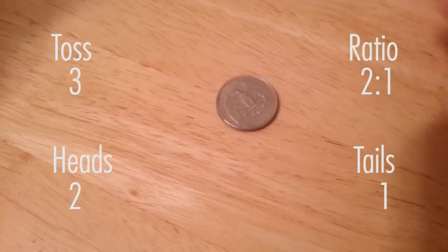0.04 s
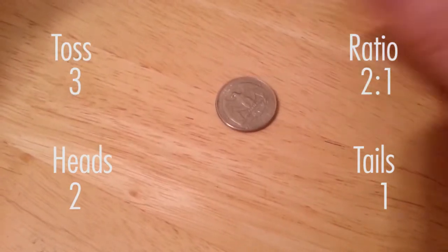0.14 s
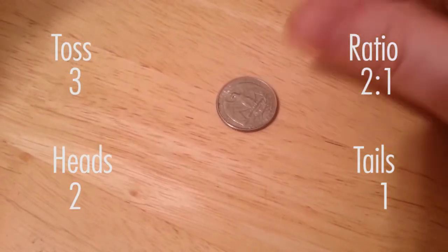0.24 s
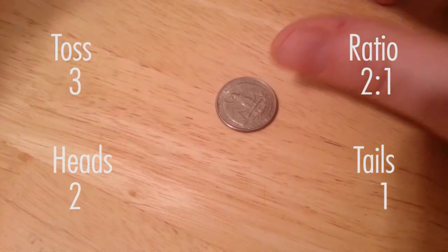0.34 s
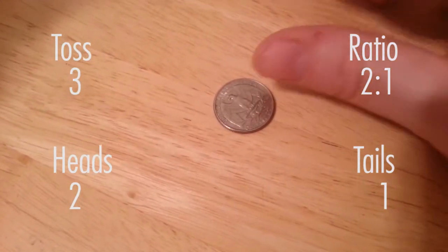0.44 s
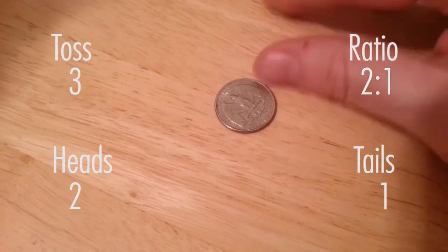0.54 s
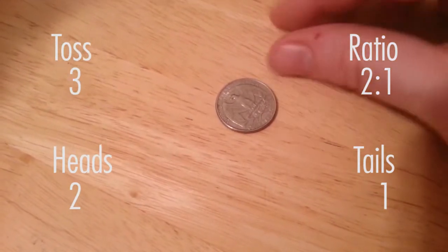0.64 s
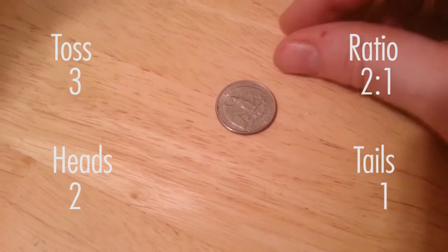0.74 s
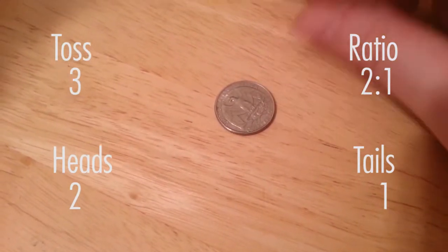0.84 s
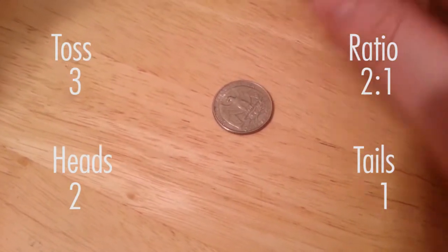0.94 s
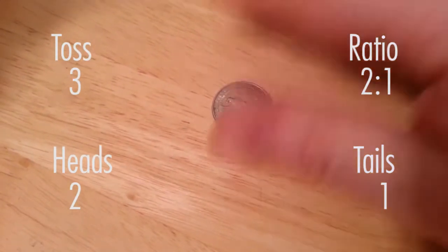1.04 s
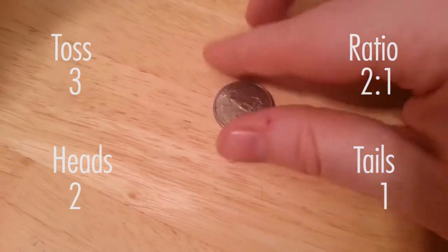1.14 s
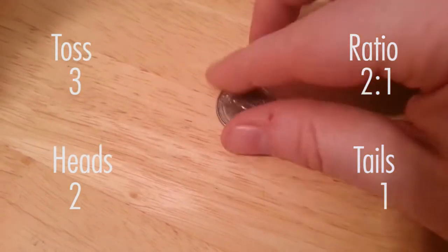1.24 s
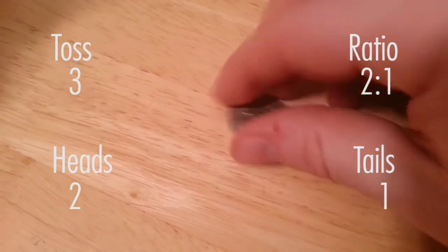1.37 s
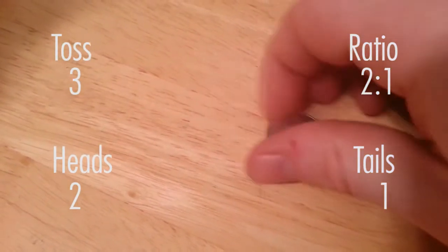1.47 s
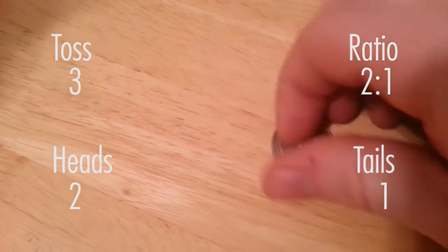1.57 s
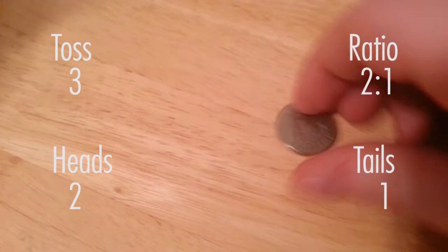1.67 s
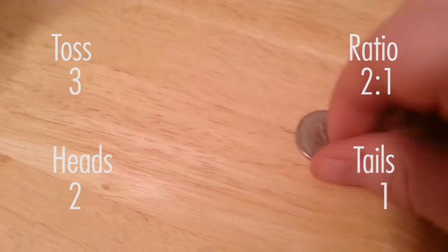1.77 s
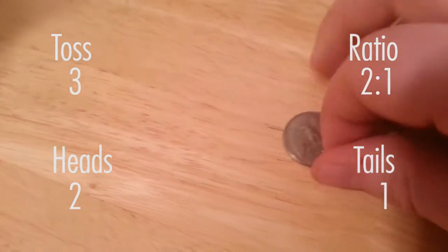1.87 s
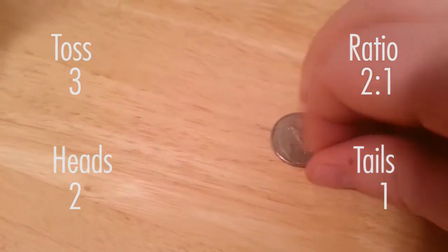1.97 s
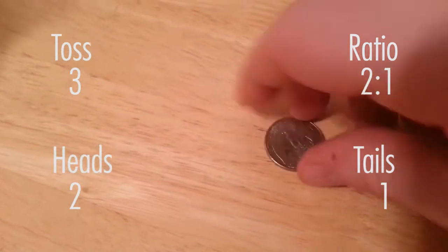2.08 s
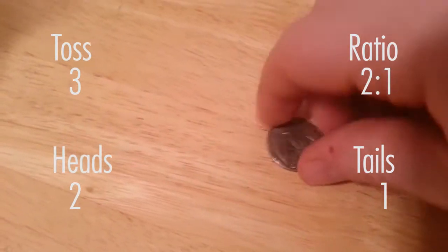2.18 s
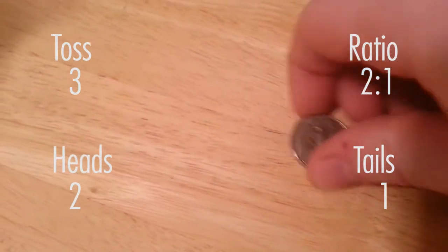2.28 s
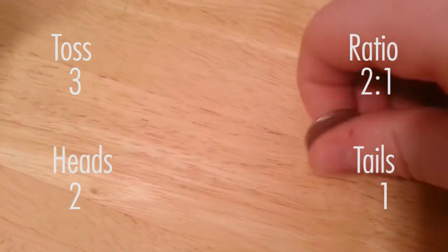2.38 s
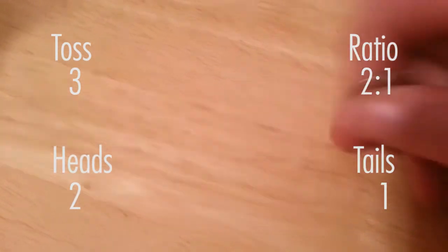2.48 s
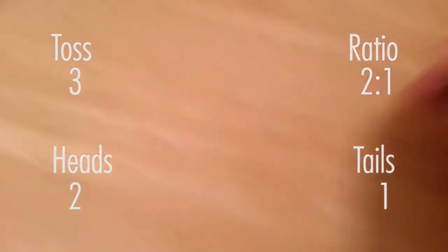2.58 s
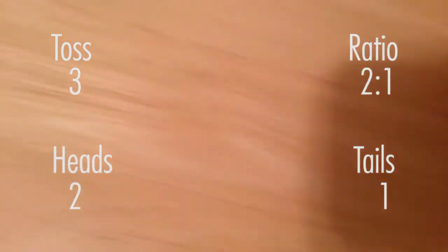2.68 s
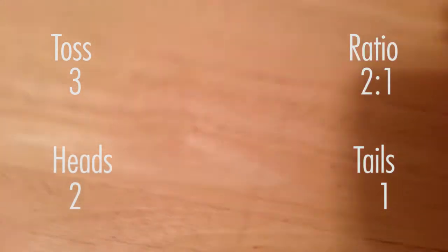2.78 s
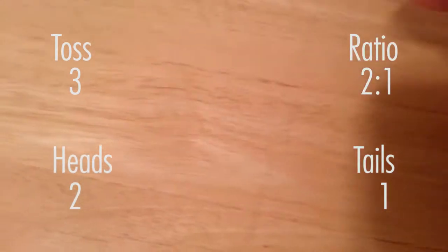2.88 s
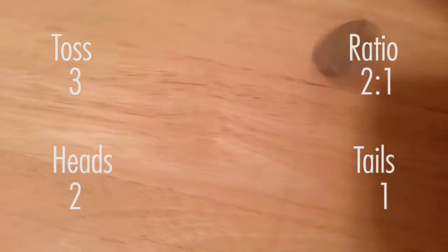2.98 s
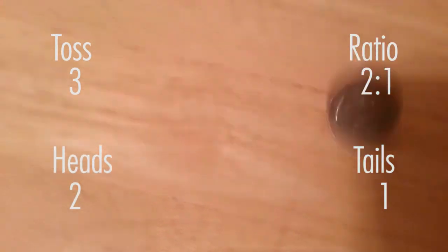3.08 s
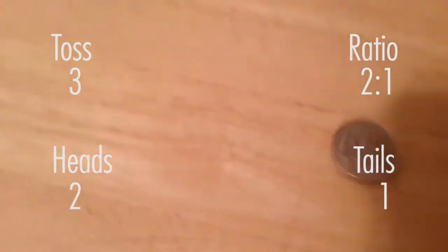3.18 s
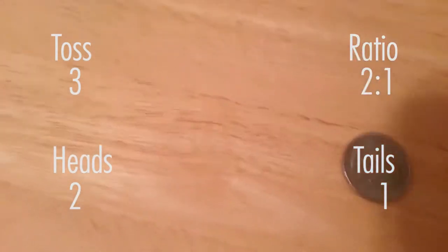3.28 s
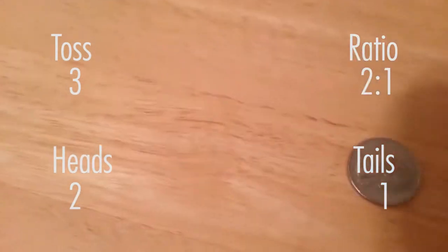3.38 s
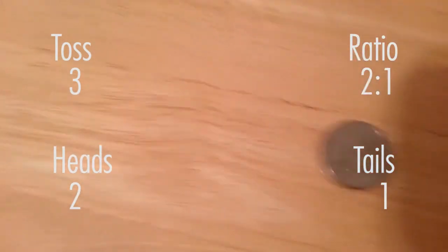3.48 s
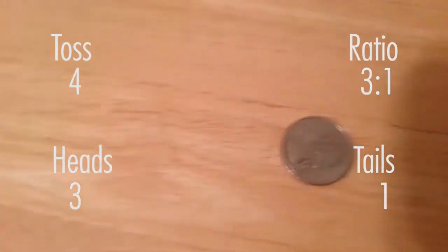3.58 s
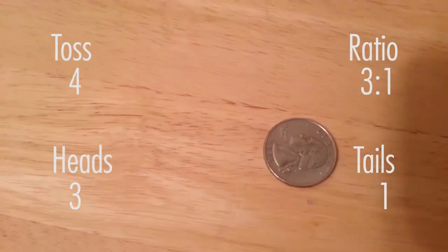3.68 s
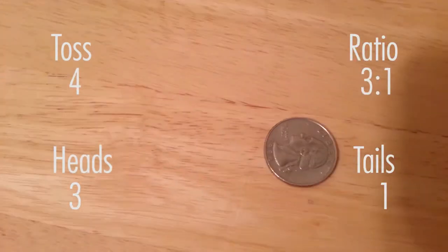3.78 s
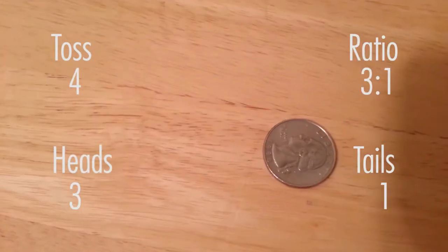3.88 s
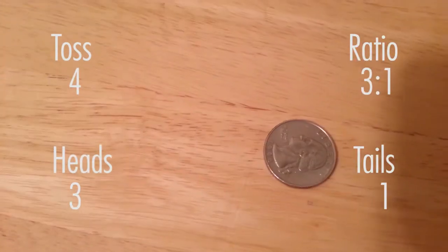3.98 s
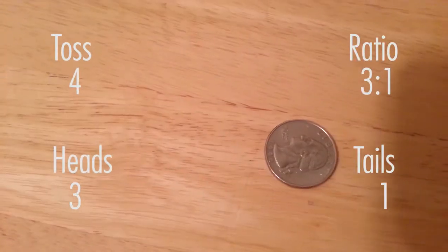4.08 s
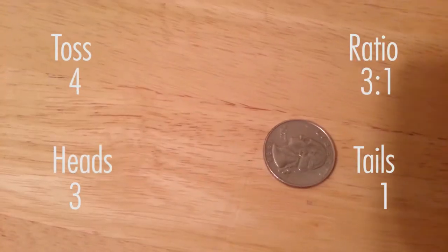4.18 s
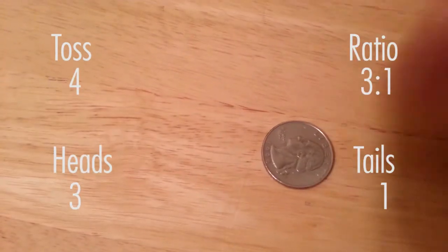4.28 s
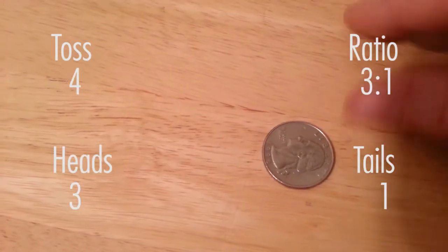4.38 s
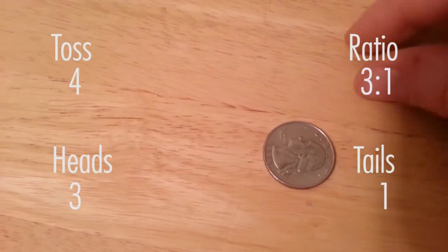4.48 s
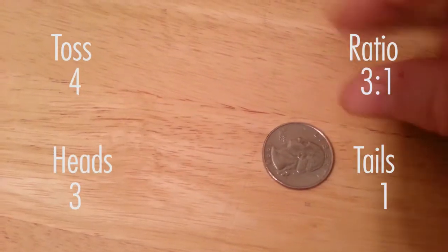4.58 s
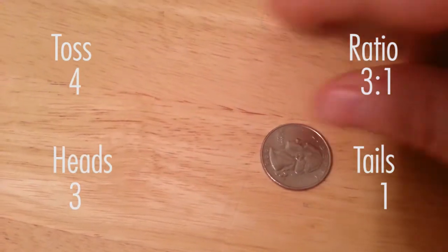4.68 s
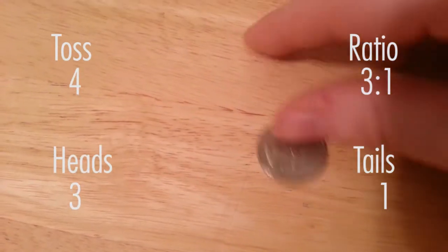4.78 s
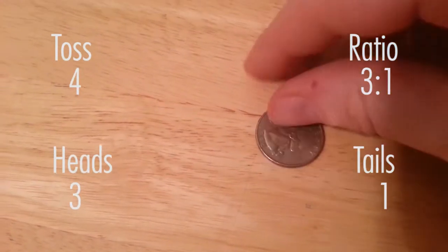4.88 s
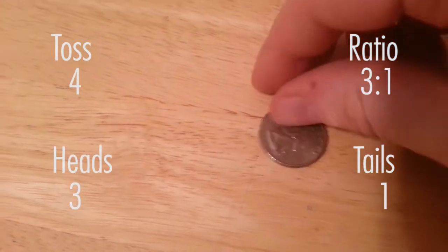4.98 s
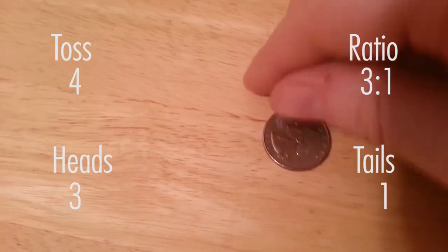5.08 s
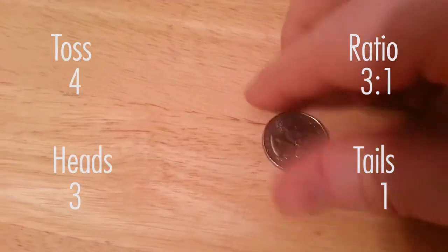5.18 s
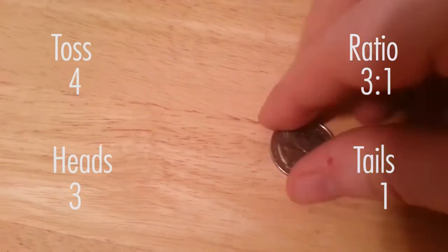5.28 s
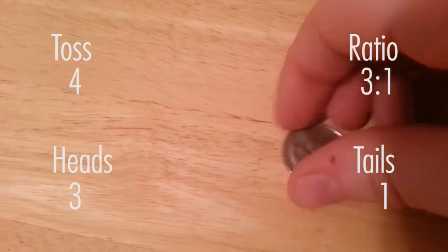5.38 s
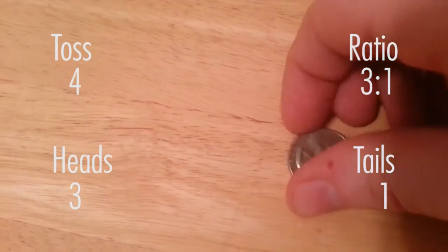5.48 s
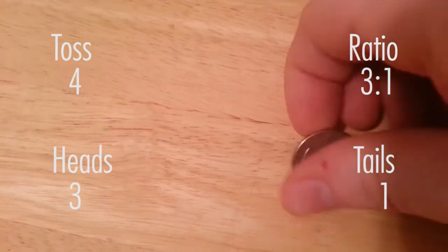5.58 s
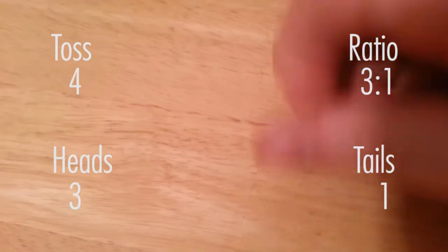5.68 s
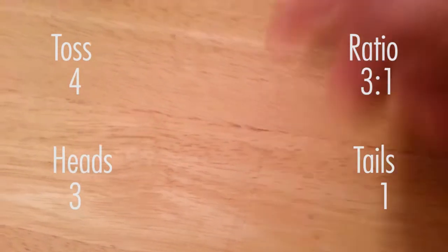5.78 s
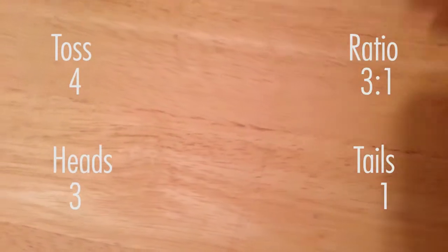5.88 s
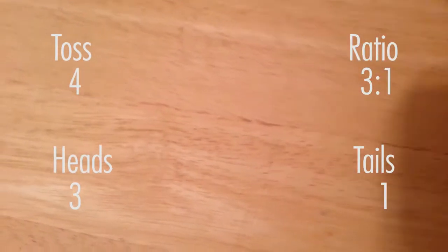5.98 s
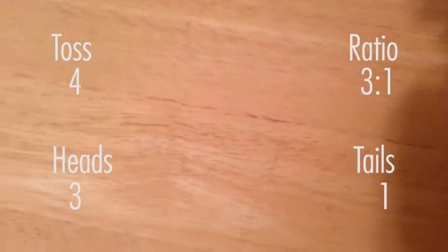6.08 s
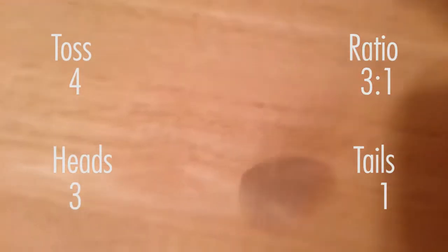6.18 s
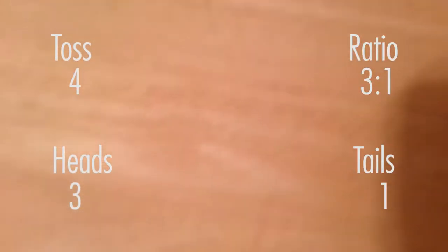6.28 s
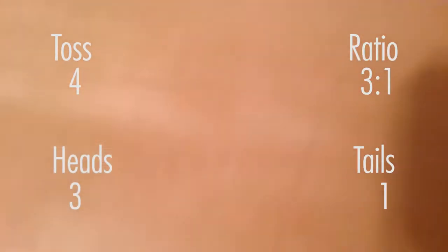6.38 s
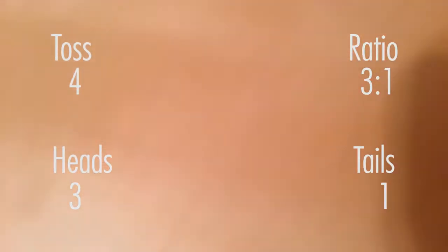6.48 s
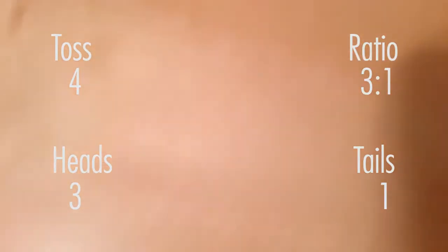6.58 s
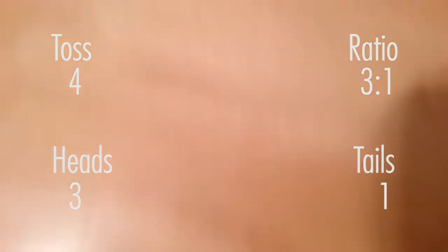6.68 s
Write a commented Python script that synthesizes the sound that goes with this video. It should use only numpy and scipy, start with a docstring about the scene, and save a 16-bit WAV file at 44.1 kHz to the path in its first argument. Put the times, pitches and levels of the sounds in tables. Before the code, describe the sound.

Close up, a coin is handled and tossed on wood: soft rubs, taps and thumps between hard knocks that speed into a ringing rattle.

```python
"""A coin rattles on its rim and rings near 9.5 kHz, over faint hiss and rumble, close to a pair of microphones.
A hand then slides it over a wooden table, rubs and taps; the arm thumps the table and small dry ticks are heard.
Twice the tossed coin lands and bounces ever faster; the loudest landings overload the input.
Each contact is a noisy force that sets the table top sounding; ringing, thumps, ticks and air noises join it."""
import sys
import numpy as np
from scipy import signal
from scipy.fft import rfft, irfft
from scipy.io import wavfile
from scipy.ndimage import uniform_filter1d

SR = 44100
rng = np.random.default_rng(int(sys.argv[2]) if len(sys.argv) > 2 else 0)


def int16_out(signal):
    """Quantize to a 16-bit WAV file."""
    q = np.round(np.clip(np.atleast_2d(signal).T, -1, 1) * 32767)
    wavfile.write(sys.argv[1], SR, q.astype(np.int16))


def gain_from_decibels(decibels):
    """Convert decibel values to linear amplitude factors."""
    exponent = np.asarray(decibels, float) / 20
    return 10 ** exponent


N = 297234  # length of the scene in samples
LEAD = 400  # samples that the band split spreads ahead of a blow
UPPER_FOLLOWS_BRIGHT = .27  # dB of upper part per dB of bright part, for coin contacts


def rms_one(x):
    """Scales a sound to rms 1."""
    return x / np.sqrt(np.mean(x ** 2) + 1e-20)


def look_up(points, hz):
    """Value of a (f/Hz, value) table on a log-frequency axis."""
    f, value = np.transpose(points)
    return np.interp(np.log(hz + 1), np.log(f + 1), value)


def add(mix, s, sound):
    """Mixes a sound in at time s."""
    part = mix[..., round(s * SR):][..., :sound.shape[-1]]
    part += sound[..., :part.shape[-1]]


def curves(rows):
    """Start time of a curve table, and its other columns drawn out sample by sample."""
    s, *values = np.transpose(rows)
    t = np.arange(s[0], s[-1], 1 / SR)
    return s[0], np.array([np.interp(t, s, v) for v in values])


def resonate(x, hz, width_hz):
    """Shifts the curve hz down to zero, smooths, and shifts back: a resonance of gain 1."""
    turn = np.exp(2j * np.pi * np.cumsum(hz * np.ones(x.shape[-1])) / SR)
    r = np.exp(-np.pi * width_hz / SR)
    smooth = signal.lfilter([1 - r], [1, -r], x / turn)
    return 2 * (turn * smooth).real


def noise(length, level_db, same, size):
    """Two partly alike channels of noise; level_db(hz, s) shapes it."""
    hz = np.fft.rfftfreq(size, 1 / SR)[:, None]
    s = np.arange(4 * length // size + 5) * size / 4 / SR
    a, b, c, d = rng.standard_normal((len(s), len(hz), 4)).T
    left, other = a + 1j * b, c + 1j * d
    like = np.clip(look_up(same, hz), -1, 1)
    right = like * left + np.sqrt(1 - like ** 2) * other
    spectra = np.array([left, right]) * gain_from_decibels(level_db(hz, s))
    return signal.istft(spectra, nperseg=size, noverlap=3 * size // 4)[1][:, :length]


RATTLE_LOW_DB, RATTLE_UPPER_DB = -6.5, -5.5  # relative to the force; upper at bright 0 dB
TOUCHES_PER_S = 300  # on average, roughly
# coin wobbling on its rim: (t/s, force level/dB, bright part level/dB relative to the force)
RIM_RATTLES = [
    [(0.0, -31, -7), (0.13, -34, -9), (0.18, -28, -3), (0.225, -35.5, -4), (0.25, -30, -2.5),
     (0.306, -31, -3.5), (0.36, -39.5, -17)],
    [(3.36, -30, -1), (3.392, -29, -21), (3.484, -38, -23.5), (3.698, -32, -7), (3.72, -48, -13)],
    [(6.51, -26, -21.5), (6.556, -29, -46), (6.63, -42.5, -60), (6.66, -32.5, -20), (6.688, -26.5, -17.5),
     (6.74, -52, -28)],
]


def rattles():
    """The rim touches down about three hundred times a second, unevenly, each touch of its own size."""
    force = np.zeros((4, N))
    for rows in RIM_RATTLES:
        s, (db, bright_db) = curves(rows)
        pace = 1 + 3.0 * uniform_filter1d(rng.standard_normal(len(db)), size=200)
        touches_so_far = np.floor(np.cumsum(TOUCHES_PER_S * np.abs(pace)) / SR)
        touch = np.diff(touches_so_far, prepend=0)
        touch *= gain_from_decibels(2.2 * rng.standard_normal(len(db)))
        roll = rms_one(touch) + 0.58 * rng.standard_normal(len(db))  # the rim also rolls between touches
        upper_db = RATTLE_UPPER_DB + UPPER_FOLLOWS_BRIGHT * bright_db
        bands_db = np.array([db + RATTLE_LOW_DB, db, db + upper_db, db + bright_db])
        add(force, s, gain_from_decibels(bands_db) * roll)
    return force


LOW_HZ, UPPER_HZ, BRIGHT_HZ = 1000, 3000, 6500  # where the four parts of the sound meet
MODES_DB, ROOM_DB = .5, -3.5  # relative to the knock
# modes (favourite pitches) of the table top: (f/Hz, width/Hz, level/dB)
WOOD_MODES = [(135, 14, 1), (255, 20, 4), (366, 12, 6), (496, 19, 2.5), (547, 22, -1.5), (673, 30, -6),
              (759, 30, -5), (1105, 12, -4), (1179, 12, -4), (1495, 25, -5), (1745, 30, -6), (2014, 35, -3),
              (2332, 45, -1), (2757, 22, -1), (2929, 30, -7), (3180, 22, -2.5), (3340, 40, -1),
              (3962, 40, -6), (4237, 60, -7), (4890, 50, -2), (5421, 60, -12), (5906, 32, -11)]
# modes too close to tell apart, as a tone colour: (f/Hz, relative level per Hz/dB)
DENSE_MODES = [(60, -57), (130, -13), (300, -0.5), (600, -6.5), (1200, -4.5), (3200, -7), (4300, -9.5),
               (5800, -14), (7000, -18.5), (8300, -25), (9700, -16), (10800, -31.5), (15500, -37.5)]
# first fall of a blow: (f/Hz, time to fall by 60 dB/s)
KNOCK_FALL = [(200, 0.081), (1000, 0.023), (4000, 0.02), (12000, 0.018)]
# slower fall of the room: (f/Hz, time to fall by 60 dB/s)
ROOM_FALL = [(150, 0.81), (1000, 0.35), (4000, 0.33), (8000, .15), (14000, 0.027)]
# how alike a blow is left and right: (f/Hz, likeness from -1 to 1)
BLOW_LIKENESS = [(100, 0.8), (300, 0.92), (640, 0.8), (1400, -0.28), (3100, 0.134), (6800, -0.26),
                 (15000, -0.099)]
# balance of a blow: (f/Hz, left minus right level/dB)
BLOW_LEAN = [(100, .5), (400, 1), (2400, -1), (9000, 2)]


def table_response(spot):
    """What one point blow leaves, as low, middle, upper and bright parts (parts x channels x samples)."""
    length = SR // 3
    t = np.arange(length) / SR

    def falling(fall):
        return lambda hz, s: look_up(DENSE_MODES, hz) - 60 * s / look_up(fall, hz)

    knock = rms_one(noise(length, falling(KNOCK_FALL), BLOW_LIKENESS, size=128))
    room = rms_one(noise(length, falling(ROOM_FALL), BLOW_LIKENESS, size=256))
    modes = np.zeros((2, length))
    for hz, width, db in WOOD_MODES:
        # the modes ring evenly wherever the contact is; only their phase shifts
        right_lag = np.arccos(np.clip(look_up(BLOW_LIKENESS, hz), -1, 1))
        lag = right_lag * np.array([[0], [1]]) + np.pi * spot / 3
        fading = gain_from_decibels(db) * np.sqrt(width) * np.exp(-np.pi * width * t)
        modes += fading * np.sin(2 * np.pi * hz * t + lag)
    hz = np.fft.rfftfreq(2 * length, 1 / SR)
    rise = 1 - np.exp(-(t / .00015) ** 2)  # the sound fades in over a fraction of a millisecond
    sound = rise * (knock + gain_from_decibels(MODES_DB) * rms_one(modes) + gain_from_decibels(ROOM_DB) * room)
    whole = rfft(sound, 2 * length)
    whole = whole * gain_from_decibels(np.outer([.5, -.5], look_up(BLOW_LEAN, hz)))
    whole = whole * (1j * hz / (115 + 1j * hz)) ** 3  # the deepest bass is taken out of the table's sound
    edges = [1 / (1 + (hz / edge) ** 4) for edge in (LOW_HZ, UPPER_HZ, BRIGHT_HZ)]
    below = [0 * hz] + edges + [1 + 0 * hz]
    parts = irfft(whole * np.diff(below, axis=0)[:, None])  # the four shares sum to 1
    parts = np.roll(parts, LEAD, axis=2)[..., :length]
    # each part gets energy 1 in the mean of left and right
    return np.array([part / np.linalg.norm(part.mean(0)) for part in parts])


COIN_HZ, PARTNER_DB = 9525, -4.5  # middle of the pair; second mode relative to the first
FLUTTER_DB = 2.5  # rms wander of the level
CLINK_WIDTH_HZ, CLINK_DB = 150, -9
# the coin set ringing; spin and contact split the pair of modes:
# (t/s, length/s, level/dB before the left-right lean, fade/dB per s, partner f minus first f/Hz)
COIN_RINGS = [(0.0, 0.14, -33, 80, -135), (.16, .2, -27.5, 110, 168), (3.031, .144, -44, 82, 27),
              (3.159, .15, -25.5, 90, 48.5), (3.304, .095, -31, 31.5, 48.5),
              (3.389, 0.26, -22, 101.5, -55.5), (6.263, 0.47, -47.5, 22, 25)]


def ring(bright_force):
    """A close pair of bending modes beats and fades with a fluttering level; contacts add a short clink."""
    out = np.zeros((2, N))
    for s, length, db, fade_db_per_s, split_hz in COIN_RINGS:
        t = np.arange(0, length, 1 / SR)
        pair = (COIN_HZ - split_hz / 2, 0), (COIN_HZ + split_hz / 2, PARTNER_DB)
        for pitch, share_db in pair:
            phase = 2 * np.pi * (pitch * t + rng.random() + np.array([[0], [.15]]))
            flutter_db = FLUTTER_DB * rms_one(uniform_filter1d(rng.standard_normal(len(t)), size=500))
            level = gain_from_decibels(db - fade_db_per_s * t + share_db + flutter_db)
            tone = np.sqrt(2) * level * np.sin(phase)
            add(out, s, tone * signal.windows.tukey(len(t), .02))
    out += gain_from_decibels(CLINK_DB) * resonate(bright_force, COIN_HZ, CLINK_WIDTH_HZ)
    return out * gain_from_decibels(np.array([[2.5], [-2.5]]))  # leans left


AIR_DB = -46.5  # rms of the room tone
# tone colour of the room: (f/Hz, relative level per Hz/dB)
AIR_COLOUR = [(15, -73), (25, -21.5), (69, 3), (93, -4), (289, -12), (523, -18), (614, -21.5), (1170, -24),
              (1660, -26), (2850, -28.5), (4500, -30), (5010, -28), (15500, -35.5)]
# how alike the room tone is left and right: (f/Hz, likeness from -1 to 1)
AIR_LIKENESS = [(60, 1), (240, 0.65), (950, -0.02), (3770, 0.024), (15000, -0.5)]


def room_tone():
    """Steady hiss and low rumble: shaped noise that does not change in level."""
    air = noise(N, lambda hz, s: look_up(AIR_COLOUR, hz) + 0 * s, AIR_LIKENESS, size=2048)
    return gain_from_decibels(AIR_DB) * rms_one(air)


def grit(length):
    """Lumpy friction noise of rms 1."""
    lumps_db = 3.5 * rms_one(uniform_filter1d(rng.standard_normal(length), size=90))
    return rms_one(rng.standard_normal(length) * gain_from_decibels(lumps_db))


SLIDE_EDGE_DB = -19.5  # at both ends, relative to the loudest moment
SLIDE_UPPER_DB, SLIDE_BRIGHT_DB = -14, -11.5  # upper part at MID_SCRAPE_HZ; bright below upper
UPPER_DB_PER_OCTAVE, MID_SCRAPE_HZ = 8.5, 1600  # higher scrapes are crisper
SCRAPE_PEAK, SCRAPE_WIDTH_HZ = 2.4, 420
SLIDE_SAG = 0.396  # share of its f by which the centre sags, as the drag slows
# coin and skin dragged over the grain: (loudest t/s, rise/s, fall/s, force level/dB, scrape centre f/Hz)
COIN_SLIDES = [(.44, .02, 0.077, -53.5, 1600), (.576, .09, 0.21, -55.5, 1470),
               (1.251, .11, 0.59, -57, 1700), (1.454, .06, .17, -43, 2340), (1.68, .06, 0.19, -42.5, 2400),
               (1.75, .08, 0.1464, -40, 1750), (2.18, .015, .06, -42, 1880),
               (2.401, .04, 0.092, -46.5, 2010), (4.618, .03, 0.156, -52.5, 1100),
               (4.856, .08, 0.074, -47, 1975), (5.294, 0.049, 0.126, -56, 2350),
               (5.499, 0.27, .2, -53.5, 1300), (5.686, 0.036, 0.01, -32.5, 1304),
               (5.71, .02, 0.21, -58, 1200)]


def slides():
    """Each drag over the grain swells and fades, peaking at a sagging resonance."""
    force = np.zeros((4, N))
    for s, rise, fall, db, hz in COIN_SLIDES:
        t = np.arange(-rise, fall, 1 / SR)
        rough = grit(len(t))
        upper_db = SLIDE_UPPER_DB + UPPER_DB_PER_OCTAVE * np.log2(hz / MID_SCRAPE_HZ)
        centre_hz = hz * (1 - SLIDE_SAG * t / (rise + fall))
        peaked = rms_one(rough + SCRAPE_PEAK * resonate(rough, centre_hz, SCRAPE_WIDTH_HZ))
        level = gain_from_decibels(db + SLIDE_EDGE_DB * np.where(t < 0, -t / rise, t / fall))
        bands = np.array([peaked, gain_from_decibels(upper_db) * rough, gain_from_decibels(upper_db + SLIDE_BRIGHT_DB) * rough])
        add(force[1:], s - rise, level * bands)
    return force


# low rubbing of the hand on the table: (t/s, force level/dB)
HAND_RUBS = [
    [(.42, -64), (.436, -45.5), (.486, -52.5), (.576, -48.5), (.9, -63.5)],
    [(1.14, -51), (1.38, -49), (1.42, -71.5), (1.62, -46.5), (1.748, -53.5), (1.828, -32), (1.92, -57)],
    [(2.36, -50), (2.398, -44), (2.52, -60)],
    [(4.4, -47), (4.6, -58), (4.75, -61), (4.856, -44), (4.95, -67)],
    [(5.25, -54), (5.294, -47.5), (5.344, -49.5), (5.64, -51.5), (5.686, -43), (5.72, -58.5), (5.88, -65)],
]


def rubs():
    """The hand rubs the table: friction noise in the low part alone."""
    force = np.zeros((4, N))
    for rows in HAND_RUBS:
        s, (db,) = curves(rows)
        add(force[0], s, gain_from_decibels(db) * grit(len(db)))
    return force


# arm and wrist bumping the table: (t/s, level/dB before the soft rise, f/Hz, time to fall by 60 dB/s)
ARM_THUMPS = [(0.429, -32.5, 78.1, 0.068), (0.572, -20.5, 53.3, 0.0415), (0.841, -40, 90.5, 0.068),
              (1.129, -25.5, 116.6, 0.157), (1.526, -12.5, 89, 0.061), (2.176, -16.5, 78.3, 0.12),
              (2.378, -16.5, 136, 0.077), (2.597, -27, 133, 0.23), (2.941, -39.5, 127, 0.75),
              (4.375, -22.5, 69.5, 0.136), (4.679, -21.5, 102.9, 0.076), (5.468, -27.5, 130.3, 0.091),
              (5.572, -23.5, 113, 0.11), (6.579, -24, 111, 0.113)]


def thumps():
    """A soft push sets a low, fading wobble going."""
    out, t = np.zeros(N), np.arange(SR // 3) / SR
    for s, db, hz, t60 in ARM_THUMPS:
        wobble = np.sin(2 * np.pi * hz * t) + 0.54 * np.sin(2 * np.pi * 1.6 * hz * t)
        soft_rise = 1 - np.exp(-t / 0.0064)
        add(out, s, gain_from_decibels(db - 60 * t / t60) * soft_rise * wobble)
    return out


TICK_HZ = 1460
# small dry ticks: (t/s, level/dB of the cycles as they start)
DRY_TICKS = [(0.4403, -24.5), (0.4653, -42), (0.4895, -34), (0.5143, -31), (0.5386, -30), (0.5673, -32),
             (0.586, -35), (0.606, -38), (1.3268, -34.5), (6.1436, -35)]


def ticks():
    """A thin click and a few cycles of a small stiff part, whose cycles lag a little on the right."""
    out, t = np.zeros((2, N)), np.arange(1000) / SR
    clicks = rng.standard_normal((len(DRY_TICKS), 2, len(t)))
    for (s, db), click in zip(DRY_TICKS, clicks):
        cycles = np.sin(2 * np.pi * (TICK_HZ * t - np.array([[0], [.2]])))
        cycles *= gain_from_decibels(-60 * t / .012)
        snap = click * np.exp(-t / .0015)
        for _ in range(2):
            snap = resonate(snap, 2300, width_hz=1600)
        add(out, s, gain_from_decibels(db) * (cycles + 1.05 * snap))
    return out


# weak blows come from a rolling rim or skin and last longer; they also lose the clean click and swell in
CONTACT_MS, SOFTER_MS_PER_DB = 2.3, .08  # fading time of a 0 dB blow; time lost per dB of force
FIRST_TOUCH, CLEAN_ABOVE_DB = 2.2, 8  # clean click relative to the rest; the force that brings it fully
RISE_SHARE = .4  # swelling time as a share of the fading time


def strike(rows):
    """Each blow is a short cluster of micro-contacts; its force is shared among the four bands."""
    force, t = np.zeros((4, N)), np.arange(1500) / SR
    jolts = rng.standard_normal((len(rows), len(t)))
    for (s, db, low_db, upper_db, bright_db), jolt in zip(rows, jolts):
        u = 1000 * t / max(CONTACT_MS - SOFTER_MS_PER_DB * db, .2)
        cluster = jolt * np.exp(-u) * (1 - np.exp(-u / RISE_SHARE))
        # the first touch is one clean click
        cluster[0] = FIRST_TOUCH * gain_from_decibels(min(db - CLEAN_ABOVE_DB, 0)) * np.linalg.norm(cluster)
        strength = gain_from_decibels(db + np.array([low_db, 0, upper_db, bright_db]))
        add(force, s, strength[:, None] * cluster / np.linalg.norm(cluster))
    return force


TAP_BRIGHT_DB = -17.5  # relative to the upper part
# fingers and nails tapping table and coin, parts relative to the force:
# (t/s, force level/dB, low part level/dB, upper part level/dB)
FINGER_TAPS = [(1.234, -20, -7, -23), (1.2563, -13, -21, -17), (1.533, -14, 6, 1.1),
               (1.6399, -11, -23, -18), (1.6745, -14, 2, -12.5), (1.7973, -11, 13, -24),
               (1.82, -15, 14, -20), (1.8384, -14, 13, -2), (1.9999, -16, 8.5, -19),
               (2.0672, -16.5, 6.5, -38.5), (2.176, -11, 2.5, -17), (2.3872, -11, -22, -18),
               (4.607, -20, 5.5, -28), (5.0757, -25, 7.16, -21), (5.2861, -19, 0, -12),
               (5.5187, -28.5, 10, 1), (5.5743, -18.5, 6.5, -17), (5.6796, 0.3, -26, -49)]


def taps():
    """Fingers and nails strike the table and coin."""
    return strike([(s, db, low_db, upper_db, upper_db + TAP_BRIGHT_DB)
                   for s, db, low_db, upper_db in FINGER_TAPS])


FUZZ_HZ = 1174
# a faint fuzzy band during arm movement, with a short burst at 5.68 s as a knock rings: (t/s, level/dB)
FUZZY_BAND = [
    [(2.2, -53.5), (2.772, -49), (2.95, -69)],
    [(5.25, -51.5), (5.66, -50), (5.685, -28), (5.73, -42), (5.9, -63)],
]


def fuzz():
    """Noise in one narrow resonance, unlike in the two channels."""
    out = np.zeros((2, N))
    for rows in FUZZY_BAND:
        s, (db,) = curves(rows)
        band = resonate(rng.standard_normal((2, len(db))), FUZZ_HZ, width_hz=65)
        add(out, s, gain_from_decibels(db) * rms_one(band))
    return out


# a brief wide swish as the hand leaves: (t/s, level/dB)
HAND_SWISH = [(2.55, -57.5), (2.652, -45), (2.75, -62.5)]


def swish():
    """Noise in one wide resonance, unlike in the two channels."""
    out, (s, (db,)) = np.zeros((2, N)), curves(HAND_SWISH)
    band = resonate(rng.standard_normal((2, len(db))), 3400, width_hz=4200)
    add(out, s, gain_from_decibels(db) * rms_one(band))
    return out


COIN_LOW_DB, COIN_UPPER_DB = -4, -3  # relative to the force, at bright 0 dB
LOW_FOLLOWS_BRIGHT = .13  # dB per dB of bright part
# coin bouncing on the wood; edge-on landings are bright:
# (t/s, force level/dB, bright part level/dB relative to the force)
COIN_BOUNCES = [(3.0074, 23.5, -20.5), (3.0743, 15.5, -32.5), (3.1316, 8, -25.5), (3.1531, 16, -2.5),
                (3.2198, 4.5, -3), (3.2322, 12, 0.5), (3.288, 1.5, 2), (3.296, 11.5, -3.5), (3.34, -3, -4),
                (3.3482, 8, 1), (3.3972, 2, 3), (3.4334, -0.44, 3), (3.4752, -1, 0), (3.512, -6.5, -0.5),
                (3.5461, 2, -7.5), (3.5752, 0.3, -1), (3.6052, -3, 0.5), (3.627, -4, -4),
                (3.6541, -4, -7.5), (3.6739, -5, 0), (3.6874, -9, -3.5), (3.7055, -12, -9),
                (6.2306, 27, -26), (6.3267, 19, -25.5), (6.3657, 15, -21.5), (6.4027, 11, -54),
                (6.4389, 12, -92), (6.4654, 7, -46), (6.4891, 3, -42), (6.5083, 8, -40), (6.5153, -4, -26)]


def bounces():
    """The coin strikes the wood; the brighter the landing, the stronger its low and upper parts."""
    rows = []
    for s, db, bright_db in COIN_BOUNCES:
        low_db = COIN_LOW_DB + LOW_FOLLOWS_BRIGHT * bright_db
        upper_db = COIN_UPPER_DB + UPPER_FOLLOWS_BRIGHT * bright_db
        rows.append((s, db, low_db, upper_db, bright_db))
    return strike(rows)


WANDER_PER_S = 7  # rounds of the three spots


def scene():
    """The contact wanders over three spots of the table, each with its own response; coin, arm and room join."""
    struck = rattles() + taps() + bounces()
    force = struck + slides() + rubs()
    table = np.zeros((2, N))
    for spot in range(3):
        turn = WANDER_PER_S * np.arange(N) / SR + spot / 3
        share = np.sqrt(2 / 3) * np.cos(np.pi * turn)  # squares sum to 1
        parts = signal.oaconvolve((share * force)[:, None], table_response(spot), axes=2)
        table += parts[..., LEAD:N + LEAD].sum(0)
    return table + ring(struck[-1]) + room_tone() + thumps() + ticks() + fuzz() + swish()


def roll_off(x):
    """The treble ends steeply here."""
    return signal.sosfilt(signal.butter(12, 15650, fs=SR, output="sos"), x)


def record(dry):
    """The input overloads, cutting off peaks beyond 0.95; a coupling filter takes out the deepest bass."""
    clipped = np.clip(dry, -.95, .95)
    rumble_cut = signal.butter(2, 40, "high", fs=SR, output="sos")
    mix = signal.sosfilt(rumble_cut, clipped)
    return roll_off(mix)


dry = scene()
out = record(dry)
int16_out(out)
```